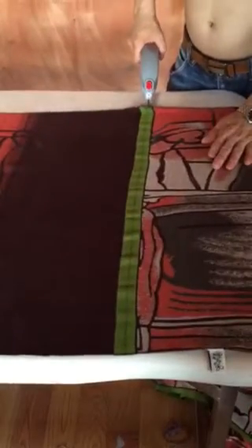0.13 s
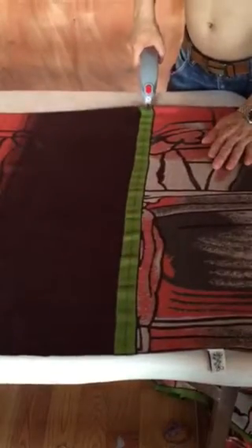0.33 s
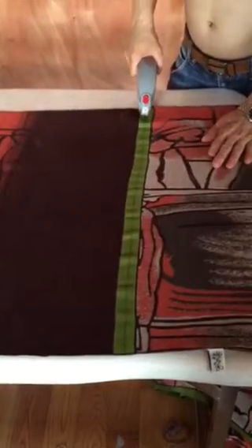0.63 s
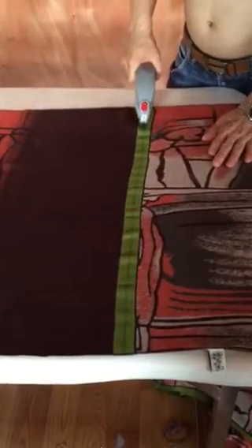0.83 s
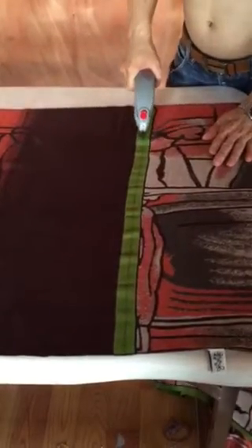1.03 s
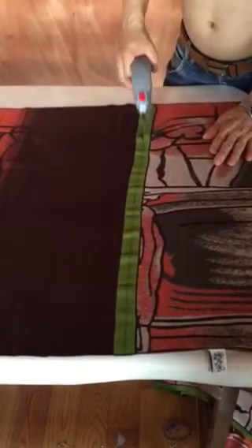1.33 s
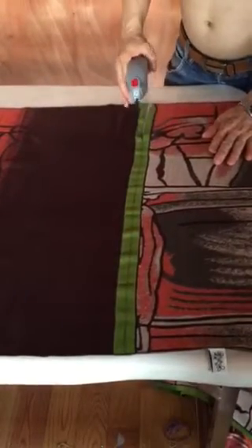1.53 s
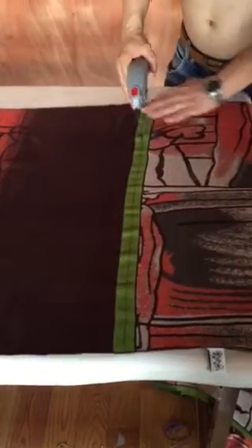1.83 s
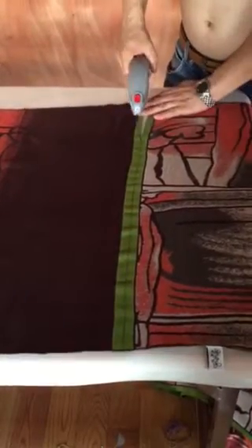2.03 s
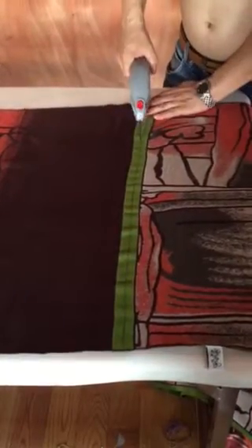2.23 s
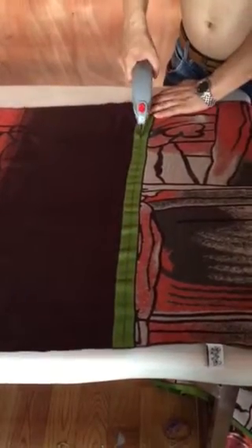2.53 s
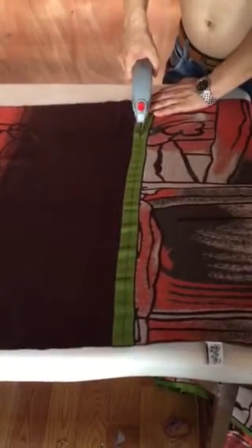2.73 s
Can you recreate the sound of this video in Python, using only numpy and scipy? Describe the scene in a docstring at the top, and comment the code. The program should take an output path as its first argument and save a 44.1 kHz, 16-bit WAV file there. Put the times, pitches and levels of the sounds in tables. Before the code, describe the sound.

Electric scissors rattle freely, then bite into cloth with a harsh, whining buzz and a few soft table thuds. They switch off and clack to a stop, leaving low room hum, then restart. Heard close in a small room.

```python
"""A small room, with electric scissors on a table. A geared crank drives the blades: they rattle freely,
bite into cloth with one hard snap per turn, are switched off and coast down in ever slower clacks,
then start again. Each impact excites the resonances of blades and shell, while the meshing teeth whine
at multiples of the crank speed. Under them are a few bumps on the table, the room's hum and rush,
and a faint swish as a hand smooths the cloth."""
import sys
import numpy as np
from scipy import signal
from scipy.fft import rfft, irfft, next_fast_len
from scipy.io import wavfile
from scipy.ndimage import map_coordinates

SR = 44100
rng = np.random.default_rng(int(sys.argv[2]) if len(sys.argv) > 2 else 0)


def master(y):
    """Save y as 16-bit WAV."""
    cut = np.clip(np.atleast_2d(y).T, -1, 1)
    pcm = np.round(cut * 32767)  # scale
    wavfile.write(sys.argv[1], SR, pcm.astype(np.int16))


N = 127890

# rotation of the crank: time_s, speed_turns_per_s
CRANK_SPEED = [(0, 79.5), (.17, 77), (.33, 75.6), (.386, 73.9), (.83, 73.95), (.92, 74.35), (1.235, 74.35),
               (1.29, 64), (1.37, 51), (1.5, 35), (1.65, 18), (1.79, 0), (2.825, 0), (2.86, 29), (2.9, 44)]
# strength of the drive's vibration: time_s, gain_db
DRIVE_GAIN = [(0, -31.5), (.04, -32.5), (.07, -36.5), (.17, -36), (.27, -31), (.4, -31.5), (.75, -31),
              (1.0, -31), (1.23, -29.5), (1.35, -32.5), (1.49, -38.5), (1.6, -42), (1.7, -49.5), (1.8, -62),
              (1.9, -85), (2.83, -75), (2.86, -43.5), (2.9, -31)]
# how hard the blades bear on the cloth: time_s, load_ratio
CLOTH_LOAD = [(.33, 0), (.39, .8), (.52, 0.84), (.58, 1.05), (.68, 1.05), (.75, .85), (.88, .75),
              (1.03, .92), (1.22, .75), (1.28, 0)]
# the blade's ring, shifting with its bite: time_s, pitch_hz
RING_PITCH = [(.39, 3880), (.52, 3670), (.64, 3250), (.77, 3100), (.87, 3800), (1.25, 3700)]
# hardest free-running knocks and single slow strokes of the blade: start_s, relative_level_db
HARD_CLACKS = [(0.0054, -20), (0.021, -23), (0.038, -20), (0.0795, -19), (0.099, -21), (0.1178, -24),
               (0.139, -21), (0.174, -21), (0.193, -21), (0.2858, -24), (0.2962, -16.5), (1.2772, -19),
               (1.3698, -20.5), (1.3797, -20), (1.3899, -20), (1.4117, -23), (1.421, -20.5), (1.4339, -22),
               (1.4454, -19.5), (1.4574, -22), (1.469, -18.5), (1.4824, -21.5), (1.497, -19), (1.5118, -21),
               (1.5272, -20.5), (1.5425, -25.5), (1.5603, -21.5), (1.5796, -24.5), (1.5997, -26),
               (1.6222, -26.5), (1.6472, -22), (1.6781, -29), (1.713, -26.5), (1.7691, -30), (2.8332, -28),
               (2.8542, -21.5), (2.8715, -23.5), (2.8841, -21.5), (2.8964, -21.5)]
# spectrum of the snaps and regular knocks: frequency_hz, gain_db
SNAP_SPECTRUM = [(200, -7), (1000, -1.5), (2300, -6), (3100, 2), (3800, 4.5), (5000, -1), (7500, -1),
                 (15000, -3.5)]
# spectrum of the hard clacks: frequency_hz, gain_db
CLACK_SPECTRUM = [(200, -4), (750, 1), (1100, 0.5), (1700, -2.5), (2500, 2.5), (3400, 3), (5000, -1.5),
                  (7500, -1.5), (11000, -5), (15000, -9)]
# spectrum of the tooth impacts: frequency_hz, gain_db
TOOTH_SPECTRUM = [(300, -12), (1200, -5), (2200, 0), (3200, -1), (4600, 1), (7000, -0.5), (15000, 3)]
# spectrum of the blade's sliding friction: frequency_hz, gain_db
SCRAPE_SPECTRUM = [(200, -0.5), (1000, -1.5), (2500, -1), (5000, 2), (9000, 2), (15000, -1)]
# resonances of blades and housing: centre_hz, width_hz, gain_db
BODY_MODES = [(946, 110, -12), (2620, 380, -2), (3890, 520, -3.5), (4580, 260, -0.5), (6370, 690, -8),
              (9120, 790, -9.5), (11800, 1400, -14)]
# broad response of the plastic shell: frequency_hz, gain_db
SHELL_RESPONSE = [(100, -41), (450, -12.5), (750, -6.5), (1400, -3), (2200, 0.5), (3200, -1), (5000, -2.5),
                  (6500, -3.5), (7600, -9.5), (9200, -7.5), (10300, -12.5), (12000, -8.5), (15500, -17)]
# tone at the tooth-passing frequency: time_s, level_db
MESH_LEVEL = [(0, -44), (.06, -46), (.12, -53.5), (.32, -54), (.4, -43.5), (.6, -44), (.8, -46.5),
              (1.22, -45), (1.32, -50), (1.5, -63), (1.7, -100)]
# partials of the gear whine: multiple_of_crank_speed, relative_level_db
WHINE_ORDERS = [(5, -23), (10, -24), (11, -23), (13, -24), (15, -19), (16, -19), (23, -23), (27, -19.5),
                (32, -16), (33, -15.5), (35, -13.5), (36, -13.5), (38, -14.5), (44, -14.5), (62, -26),
                (63, -16)]
# the tool bumps the table as it enters the cloth: start_s, level_db
TABLE_BUMPS = [(.345, -42), (0.451, -30), (.482, -41), (.562, -33), (0.602, -28)]
# time for the reverberation to fall 60 dB: frequency_hz, decay_s
REVERB_TIME = [(200, 0.33), (3000, 0.32), (12000, 0.25)]
# spectrum of the room's rush: frequency_hz, gain_db
RUSH_SPECTRUM = [(20, -25), (38, -6), (70, -1.5), (135, 1.5), (200, -4.5), (260, -3.5), (385, -10.5),
                 (440, -14), (900, -14), (2000, -17), (3000, -23), (4500, -30.5), (7500, -43),
                 (10000, -44.5), (15000, -51.5)]
# the two hum notes: low_pitch_hz, high_pitch_hz
HUM_PITCHES = (48.7, 100.6)
# course of the low hum: time_s, level_db
LOW_HUM_LEVEL = [(0, -49), (.7, -51), (1.2, -54), (1.65, -45.5), (2.05, -45.5), (2.22, -63), (2.35, -50),
                 (2.6, -48.5), (2.73, -41), (2.9, -45)]
# course of the high hum: time_s, level_db
HIGH_HUM_LEVEL = [(0, -51), (.8, -46.5), (1.0, -62), (1.25, -63), (1.36, -38), (1.46, -59), (1.76, -59),
                  (1.85, -42), (2.22, -42.5), (2.5, -53), (2.9, -60)]
# faint machine tones in the room: pitch_hz, level_db
MACHINE_TONES = [(226, -60), (390, -62), (833, -66)]

GEAR_TEETH = 12
FIRST_BITE_S, KNOCKS_END_S = .3857, 1.365
TIME_S = np.arange(N) / SR


def snaps(turns, load, snap_db=-8, bounce_s=0.000778, bounce_db=-7, ring_db=-28.5, ring_decay_s=.0007):
    """Impulse excitation: once a turn the blades snap through the cloth, rebound and ring briefly."""
    times, samples = contacts(turns, per_turn=1, scatter_s=1.5e-5)
    sizes = amp(rng.normal(0, 0.61, len(times))) * load[samples]
    cuts = impacts(times, amp(snap_db) * sizes, rough=.3, rise_s=0.002, fall_s=0.0011)
    rebound_times = times + bounce_s + rng.normal(0, 5e-5, len(times))
    cuts += pulses(rebound_times, amp(snap_db + bounce_db) * sizes)
    latest = np.maximum(np.searchsorted(times, TIME_S) - 1, 0)
    age_s = np.maximum(TIME_S - times[latest], 0)
    ring = sizes[latest] * np.sin(2 * np.pi * curve(RING_PITCH) * age_s) * np.exp(-age_s / ring_decay_s)
    return amp(ring_db) * ring + shaped(bending(cuts), SNAP_SPECTRUM)


def clacks(turns, drive, load, knock_db=16.5, clack_db=8.5):
    """Mechanical clearance: the loose blade knocks at both ends of its stroke; cloth cushions it."""
    times, samples = contacts(turns, per_turn=2, scatter_s=0.000407)
    cushion = 1 - 0.69 * np.clip(load[samples], 0, 1)
    sizes = amp(knock_db + rng.normal(0, 1.8, len(times))) * drive[samples] * cushion
    knocks = impacts(times, sizes * (times < KNOCKS_END_S), rough=0.76, rise_s=0.00073, fall_s=0.0017)
    start_s, level_db = np.transpose(HARD_CLACKS)
    hard = impacts(start_s + .001, amp(level_db + clack_db), rough=0.92, rise_s=0.00034, fall_s=0.0025)
    return shaped(bending(knocks), SNAP_SPECTRUM) + shaped(bending(hard), CLACK_SPECTRUM)


def gear_chatter(turns, drive, load, backlash_s=0.000132, gain_db=-7):
    """Transmission error: each tooth ticks with its own force and timing; load takes up the backlash."""
    times, samples = contacts(turns, per_turn=GEAR_TEETH, scatter_s=3e-5)
    count = len(times)
    force_error, spacing_error = rng.standard_normal((GEAR_TEETH, 2))[np.arange(count) % GEAR_TEETH].T
    play_s = backlash_s * np.clip(1 - 2 * load[samples], 0, 1) * rng.standard_normal(count)
    sizes = amp(1.4 * force_error + rng.normal(0, 3.2, count))
    ticks = impacts(times + 0.0003965 * spacing_error + play_s, sizes,
                    rough=0.18, rise_s=.0001, fall_s=0.00055)
    ticks = shaped(bending(ticks), TOOTH_SPECTRUM)
    return drive * amp(gain_db) * ticks / np.std(ticks[:SR])


def blade_scrape(turns, drive, gain_db=-6):
    """Sliding friction: the blade makes noise that swells with each stroke, twice a turn."""
    noise = rng.standard_normal(N)
    swell_db = 3.0 * np.cos(4 * np.pi * turns) + 2.05 * wobble(400)
    return drive * amp(gain_db) * shaped(unit(noise * amp(swell_db)), SCRAPE_SPECTRUM)


def bending(x, spread_s=0.00079, corner_hz=5000):
    """Dispersion: bending waves in thin steel carry the treble of a click ahead of its bass."""
    size = next_fast_len(N + SR // 4)
    hz = np.fft.rfftfreq(size, 1 / SR)
    delay_s = spread_s * (1 / (1 + (hz / corner_hz) ** 2) - .5)
    phase = 2 * np.pi * np.cumsum(delay_s) * SR / size
    return irfft(rfft(x, size) * np.exp(-1j * phase), size)[:N]


def housing(x, modes_db=2):
    """Resonance: the modes of blades and plastic shell colour every contact."""
    def response(hz):
        mode_power = sum(amp(db + modes_db) ** 2 / (1 + (2 * (hz - centre) / width) ** 2) ** 2
                         for centre, width, db in BODY_MODES)
        return np.sqrt(amp(along(SHELL_RESPONSE, hz)) ** 2 + mode_power)
    return filtered(x, response)


def mesh_tone(turns, waver_db=1, flutter_rad=0.27):
    """Periodic forcing: the gears sound at the tooth-passing frequency, sinking as the crank slows."""
    level = amp(curve(MESH_LEVEL) + waver_db * wobble(9.1))
    return np.sqrt(2) * level * np.sin(2 * np.pi * GEAR_TEETH * turns + flutter_rad * wobble(60))


def gear_whine(turns, drive, load, gain_db=-2, load_db=3, waver_db=2.5, flutter_rad=0.28):
    """Modulation: sidebands and overtones of the gear mesh sing, firmer under load and at full speed."""
    pace = curve(CRANK_SPEED) / curve(CRANK_SPEED).max()
    load = np.clip(load, 0, 1)
    partials = np.zeros(N)
    for order, db in WHINE_ORDERS:
        level = amp(db + waver_db * wobble(8.93))
        phase = 2 * np.pi * (order * turns + rng.random())
        partials += level * np.sin(phase + flutter_rad * (2 - load) * wobble(70))
    return np.sqrt(2) * drive * pace ** 2 * amp(gain_db + load_db * (load - 0.5)) * partials


def table_bumps(pitch_hz=88, decay_s=0.0082):
    """Damped oscillation: the padded table top answers each bump with a soft thud."""
    start_s, level_db = np.transpose(TABLE_BUMPS)
    age_s = np.maximum(TIME_S - start_s[:, None], 0)
    return -amp(level_db) @ (np.sin(2 * np.pi * pitch_hz * age_s) * np.exp(-age_s / decay_s))


def cloth_swish(peak_s=2.274, half_width_s=.08, centre_hz=9400, width_hz=330, level_db=-62.5):
    """Friction: the weave sings in a narrow band of noise as it slides under the hand."""
    band = filtered(rng.standard_normal(N), lambda hz: 1 / (1 + (2 * (hz - centre_hz) / width_hz) ** 4))
    stroke = 1 / (1 + ((TIME_S - peak_s) / half_width_s) ** 4)
    return unit(band) * stroke * amp(level_db + 3.6 * wobble(24.83))


def reverberation(x, gain_db=-5.5):
    """Absorption: reflections from table and walls decay exponentially, the treble first."""
    hz, age_s, spectra = signal.stft(rng.standard_normal(SR // 2), SR, nperseg=256)
    decay = amp(-60 * age_s / along(REVERB_TIME, hz)[:, None])
    tail = signal.istft(spectra * decay, SR, nperseg=256)[1]
    delayed = np.pad(x, (SR // 400, 0))
    return amp(gain_db) * signal.fftconvolve(delayed, tail / np.linalg.norm(tail))[:N]


def room_background(rush_db=-42.5):
    """Superposition: a broadband rush, a wavering hum and faint machine tones add up in the room."""
    rush = amp(rush_db + 0.8 * wobble(5.89)) * unit(shaped(rng.standard_normal(N), RUSH_SPECTRUM))
    low_hz, high_hz = HUM_PITCHES
    notes = [(low_hz, curve(LOW_HUM_LEVEL)), (high_hz, curve(HIGH_HUM_LEVEL)), *MACHINE_TONES]
    tones = sum(amp(db + wobble(8.15)) * np.sin(2 * np.pi * hz * TIME_S + 0.39 * wobble(5))
                for hz, db in notes)
    return rush + np.sqrt(2) * tones


def crank_turns():
    """Rotation is the integral of speed, here in turns from the first bite."""
    turns = np.cumsum(curve(CRANK_SPEED)) / SR
    return turns - turns[int(FIRST_BITE_S * SR)]


def contacts(turns, per_turn, scatter_s):
    """Contacts recur at equal crank angles: their jittered times and unjittered sample numbers."""
    marks = np.arange(np.ceil(turns[0] * per_turn), turns[-1] * per_turn) / per_turn
    samples = np.interp(marks, turns, np.arange(N))
    return samples / SR + rng.normal(0, scatter_s, len(samples)), samples.astype(int)


def impacts(times, sizes, rough, rise_s, fall_s):
    """Metal contact: the share `rough` of the energy is a burst of grit, the rest a clean click."""
    lag_s = np.arange(-SR // 100, SR // 100) / SR
    burst = np.exp(-2 * np.abs(lag_s) / np.where(lag_s < 0, rise_s, fall_s))
    energy = np.bincount(np.clip(times * SR, 0, N - 1).astype(int), sizes ** 2, N)
    power = np.abs(signal.fftconvolve(energy, burst / burst.sum(), 'same'))
    grit = np.sqrt(power) * rng.standard_normal(N)
    return np.sqrt(1 - rough) * pulses(times, sizes) + np.sqrt(rough) * grit


def pulses(times, sizes):
    """Band-limited interpolation: a windowed sinc places each impulse between samples."""
    centres = times[:, None] * SR
    taps = np.floor(centres).astype(int) + np.arange(-7, 9)
    kernel = np.sinc(taps - centres) * np.sinc((taps - centres) / 8) * ((taps >= 0) & (taps < N))
    return np.bincount(np.clip(taps, 0, N - 1).ravel(), (kernel * sizes[:, None]).ravel(), N)


def filtered(x, response):
    """Minimum-phase filtering of x by the gain response(hz), scaled to unit energy."""
    size = 2 * next_fast_len(N // 2 + SR // 8)
    gain = unit(response(np.fft.rfftfreq(size, 1 / SR)))
    cepstrum = irfft(np.log(np.maximum(gain, 1e-6)))
    cepstrum[1:size // 2] *= 2  # folding the cepstrum makes the filter causal
    cepstrum[size // 2 + 1:] = 0
    return irfft(rfft(x, size) * np.exp(rfft(cepstrum)), size)[:N]


def shaped(x, spectrum):
    """Filtering of x by (frequency_hz, gain_db) rows."""
    return filtered(x, lambda hz: amp(along(spectrum, hz)))


def along(rows, hz):
    """Interpolation of (frequency_hz, value) rows on a logarithmic frequency axis."""
    row_hz, values = np.transpose(rows)
    return np.interp(np.log(hz + 1), np.log(row_hz + 1), values)


def curve(rows):
    """Linear interpolation of (time_s, value) rows at every sample."""
    return np.interp(TIME_S, *np.transpose(rows))


def wobble(rate_hz):
    """Smooth random fluctuation through rate_hz knots a second."""
    knots = rng.standard_normal(int(N * rate_hz / SR) + 4)
    return map_coordinates(knots, [TIME_S * rate_hz])


def amp(db):
    """Amplitude ratio of a level in decibels."""
    return 10 ** (np.asarray(db) / 20)


def unit(x):
    """Normalisation to an rms of 1."""
    return x / np.sqrt(np.mean(x ** 2) + 1e-20)


def scene():
    """Source and filter: one crank times the contacts, the housing radiates them, the room reflects."""
    turns, drive, load = crank_turns(), amp(curve(DRIVE_GAIN)), curve(CLOTH_LOAD)
    blades = snaps(turns, load) + clacks(turns, drive, load)
    rattle = housing(blades + gear_chatter(turns, drive, load) + blade_scrape(turns, drive))
    scissors = rattle + reverberation(rattle) + mesh_tone(turns) + gear_whine(turns, drive, load)
    return (scissors + room_background() + table_bumps() + cloth_swish())[None]


def record(dry, cutoff_hz=15500):
    """Band limiting: an ideal low-pass filter passes nothing above the cutoff."""
    size = next_fast_len(N + SR // 4)
    passband = np.fft.rfftfreq(size, 1 / SR) < cutoff_hz
    return irfft(rfft(dry, size) * passband, size)[..., :N]


dry = scene()
out = record(dry)
master(out)
```